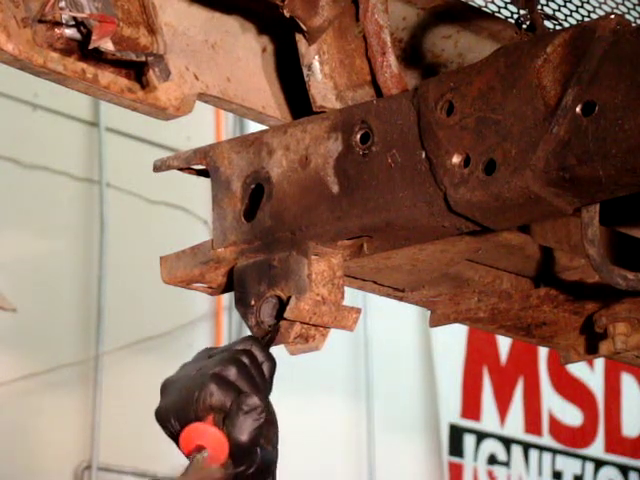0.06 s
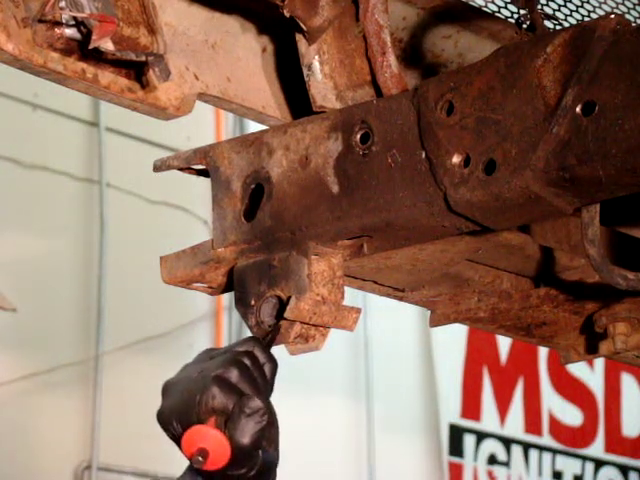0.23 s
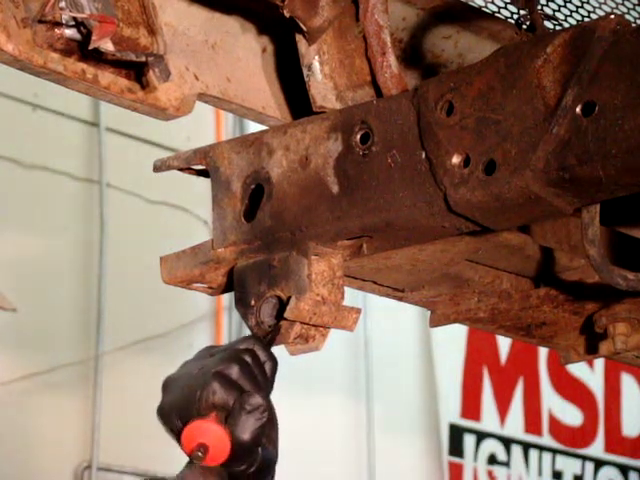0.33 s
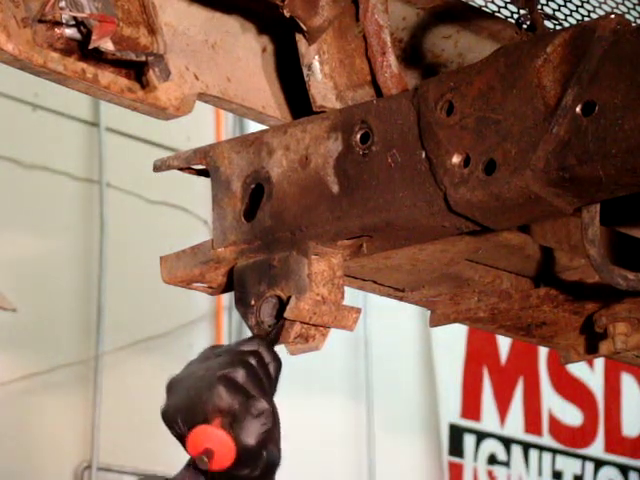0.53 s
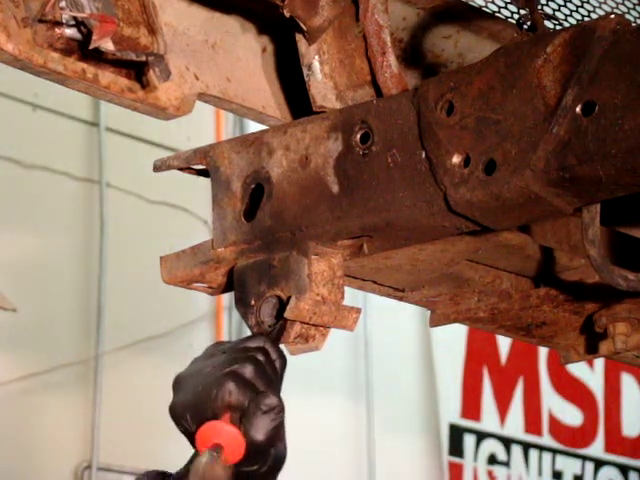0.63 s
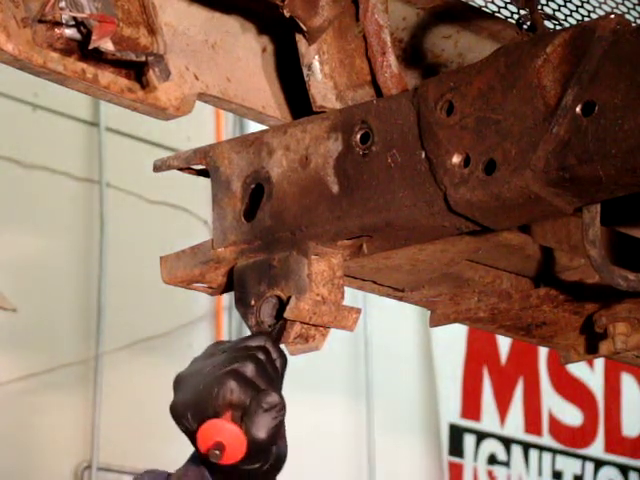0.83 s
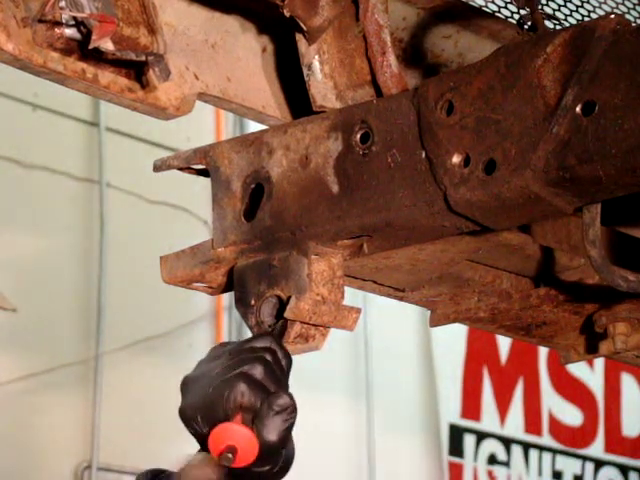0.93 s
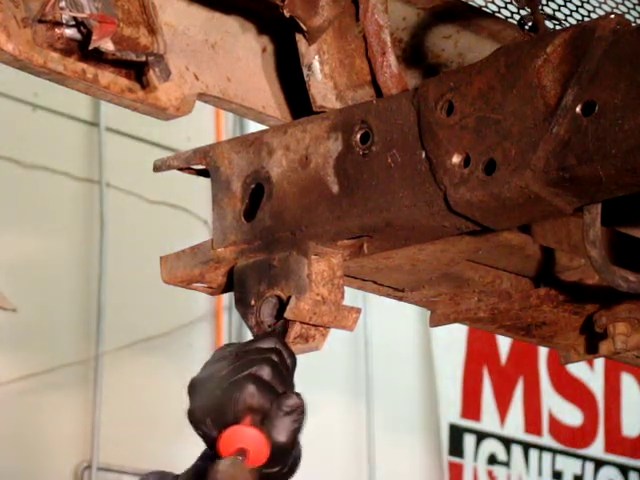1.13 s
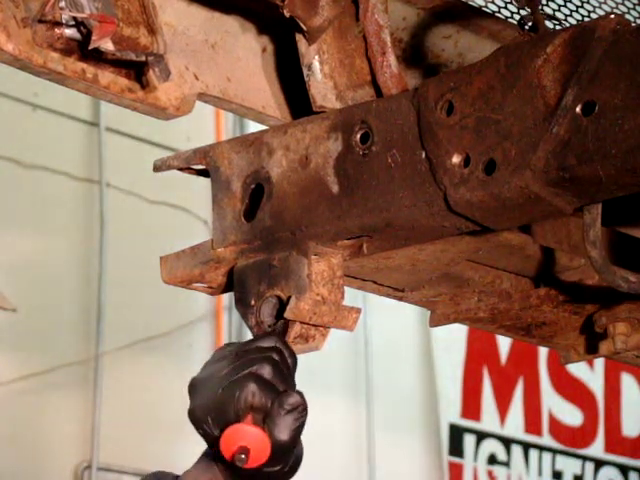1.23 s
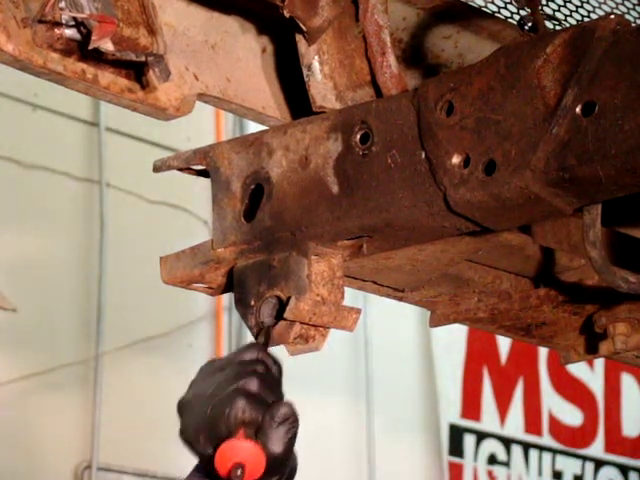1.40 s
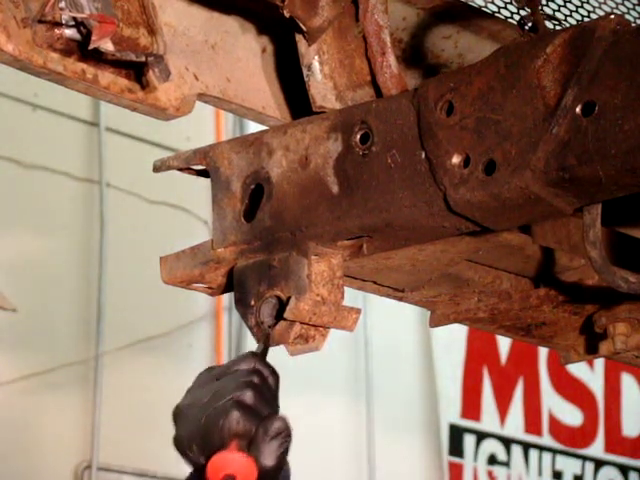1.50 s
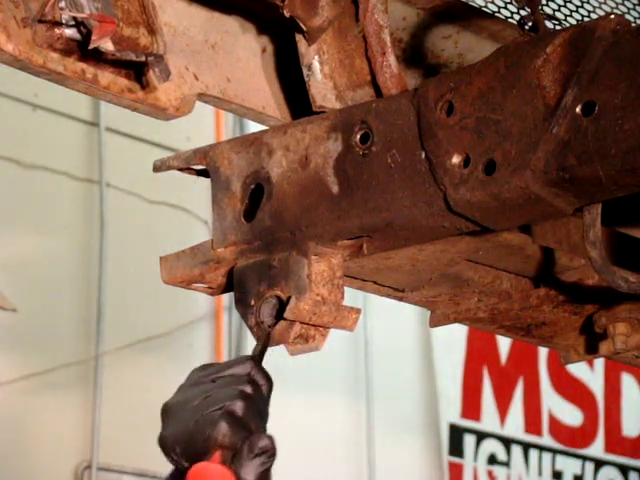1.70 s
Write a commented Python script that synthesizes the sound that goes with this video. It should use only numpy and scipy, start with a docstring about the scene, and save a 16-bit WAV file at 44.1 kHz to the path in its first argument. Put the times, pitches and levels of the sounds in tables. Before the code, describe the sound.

A hammer strikes a steel punch five times, ringing blows in a hard-walled garage.

```python
"""Low room noise and the tail of an earlier ring, on one microphone in a hard-walled garage.
Then five blows: a hammer drives a steel punch against a sleeve in a vehicle frame.
Each is a crack and a short clang of the punch; a bright wash fills the room and the frame rings on.
The first two blows ring near 3 kHz, the last three near 2.1 kHz, as the punch seats differently.
The recorder's gain control ducks the loud blows."""
import sys
import numpy as np
from scipy import signal
from scipy.fft import rfft, irfft
from scipy.io import wavfile
from scipy.ndimage import uniform_filter1d

SR = 44100
rng = np.random.default_rng(int(sys.argv[2]) if len(sys.argv) > 2 else 0)


def digitize_waveform(pressure):
    """Quantize a signal to 16-bit integers and store it at the path in sys.argv[1].

    Rows of a 2-D input are taken as channels; values are limited to [-1, 1].
    """
    field = np.atleast_2d(pressure).T
    bounded = np.clip(field, -1, 1)
    quanta = np.round(bounded * 32767).astype(np.int16)
    wavfile.write(sys.argv[1], SR, quanta)


N = 77175
T = np.arange(N) / SR
HZ = np.maximum(np.fft.rfftfreq(N, 1 / SR), 1)
CUTOFF_HZ = 10150


def from_db(db):
    """Decibels to gain."""
    return 10 ** (np.asarray(db) / 20)


def at_hz(points, hz):
    """Read a table on a log-frequency axis."""
    freqs, values = np.transpose(points)
    return np.interp(np.log(hz), np.log(freqs), values)


def decay(t60):
    """Free decay by 60 dB in t60 seconds."""
    return np.exp(-np.log(1000) * T / t60)


def rise(seconds):
    """Smooth growth from 0 to 1."""
    return 1 - np.exp(-T / seconds)


def noise_spectrum(points):
    """Spectrum of a fresh noise of the given colour and rms 1."""
    gain = from_db(at_hz(points, HZ)) * (HZ < CUTOFF_HZ)
    return rfft(rng.standard_normal(N)) * gain / np.sqrt(np.mean(gain ** 2))


# The garage between blows. Each row: frequency in Hz, relative level in dB.
ROOM_TONE = [(25, -22), (65, -20), (100, -10.5), (170, -13), (340, 5.5), (600, -6.5), (2000, -12),
             (5000, -22), (10000, -23.5)]
# An earlier ring, still hanging in the room. Each row: frequency in Hz, relative level in dB.
EARLIER_RING = [(100, -5), (250, -5), (350, 8.5), (550, -7.5), (1500, -10.5), (3000, -8), (6000, -13),
                (10000, -17.5)]


def garage():
    """Steady room noise and the fading ring of an earlier blow."""
    tail = from_db(-43) * irfft(noise_spectrum(EARLIER_RING), N) * decay(t60=1.63)
    room = from_db(-50) * irfft(noise_spectrum(ROOM_TONE), N)
    return tail + room


# The blows at the vehicle frame. Each row: start in seconds, hit gain in dB, ring gain in dB,
# then the colour in dB of each of the seven seating zones.
HAMMER_BLOWS = [(0.2007, 0, 2, 4, -3, -4, 4, -1, -1, 3.5), (0.4727, -2, 1, 0.5, -1, -2, 8, 3, -3, 8.5),
                (0.7322, -1.5, 2, -1.5, 1.5, 1.5, -1.5, 5, -1.5, 4.5),
                (0.9914, 0, 1.5, -2, 1, 3, -3.5, 4.5, -2, -2.5),
                (1.2403, -1, 0.5, -2.5, 2, 2, -1, -0.5, -3.5, 2)]


def hammering():
    """Each blow: crack and punch clang, then the ring of frame and room."""
    out = np.zeros(N)
    common_spectrum = noise_spectrum(WASH_COLOUR)
    for start_s, hit_db, ring_db, *colour_db in HAMMER_BLOWS:
        hit = from_db(hit_db) * (crack(colour_db) + punch_clang(colour_db))
        ring = from_db(ring_db) * (frame_ring(colour_db) + wash(common_spectrum, colour_db))
        blow = (hit + ring) * rise(seconds=0.00048)
        start = int(start_s * SR)
        out[start:] += blow[:N - start]
    return out


# Zones that vary with the seating of the punch: boom, clank, punch, sleeve, ping, hiss, sizzle.
# Each row: centre in Hz, width in octaves.
SEATING_ZONES = [(330, 1.12), (1250, 0.23), (2100, 0.16), (3000, 0.33), (4250, 0.023), (6300, 0.74),
                 (8150, 0.14)]


def seating(colour_db, hz):
    """Gain at each frequency from the way the punch sits for one blow."""
    bumps_db = (db * np.exp(-.5 * (np.log2(hz / centre) / width) ** 2)
                for db, (centre, width) in zip(colour_db, SEATING_ZONES))
    return from_db(sum(bumps_db))


# The contact, as it reaches the microphone. Each row: frequency in Hz, relative level in dB.
CRACK_COLOUR = [(40, -32.5), (150, -26), (330, -6.5), (550, -16), (800, -8), (1700, 0), (2200, -6.5),
                (4400, 2.5), (6500, -3.5), (10000, -10.5)]


def crack(colour_db):
    """Steel meets steel: a brief burst of noise."""
    burst = irfft(noise_spectrum(CRACK_COLOUR) * seating(colour_db, HZ), N)
    return from_db(-5.5) * burst * decay(t60=0.042)


def modes(table, colour_db, build_cycles, waver_depth=0):
    """Struck modes, each with a slightly different strength on every blow."""
    out = np.zeros(N)
    for hz, db, t60 in table:
        gain = from_db(db + 2 * rng.standard_normal()) * seating(colour_db, hz)
        swing = 1 + waver_depth * waver() if waver_depth else 1
        tone = np.real(swing * np.exp(2j * np.pi * (hz * T + rng.random())))
        out += gain * tone * rise(build_cycles / hz) * decay(t60)
    return out


# Modes of punch and hammer. Each row: pitch in Hz, relative level in dB, t60 in seconds.
PUNCH_MODES = [(1446, -17.5, 0.1), (2075, -9, 0.047), (2154, -14, 0.1), (2820, -20.5, 0.11),
               (3030, -19, 0.18), (4155, -15.5, 0.081), (4530, -13.5, 0.07), (6430, -12.5, 0.034),
               (6486, -7.5, 0.023), (7740, -30, 0.02)]


def punch_clang(colour_db):
    """The struck tools ring at once and die quickly."""
    return modes(PUNCH_MODES, colour_db, build_cycles=0.39)


# Frame and garage ringing around the microphone. Each row: frequency in Hz, relative level in dB.
WASH_COLOUR = [(40, -26.5), (110, -29.5), (152, -6.5), (200, -12.5), (300, -3), (400, -2.5), (500, -2.5),
               (650, -2), (800, -0.5), (950, -3.5), (1250, 0.5), (1650, -3.5), (2100, -1), (2600, -2),
               (3600, -3.5), (4400, -1.5), (5400, -4.5), (7000, -12), (10000, -15.5)]
# How the room fills. Each row: frequency in Hz, rise time in seconds.
WASH_RISE = [(200, 0.041), (700, 0.0064), (2500, 0.0036), (8000, 0.016)]
# How the ring dies away. Each row: frequency in Hz, t60 in seconds.
WASH_DECAY = [(100, 0.85), (350, 1.22), (1000, 1.082), (2200, 1.07), (4500, 0.88), (9000, 0.53)]
WASH_SHARED = 0.79   # share of the power whose fine ring pattern is common to all blows
WALL_DELAY_S, WALL_SHARE = 0.025, 0.17   # the walls return this share of the wash after a delay


def wash(common_spectrum, colour_db):
    """Countless modes of frame and room; the lows fill later and outlast the top."""
    spectrum = np.sqrt(WASH_SHARED) * common_spectrum
    spectrum += np.sqrt(1 - WASH_SHARED) * noise_spectrum(WASH_COLOUR)
    spectrum *= seating(colour_db, HZ)
    edges_hz = np.geomspace(20, 11000, 15)
    out = np.zeros(N)
    for low, high in zip(edges_hz, edges_hz[1:]):
        hz = np.sqrt(low * high)
        band = irfft(spectrum * ((HZ >= low) & (HZ < high)), N)
        out += band * rise(at_hz(WASH_RISE, hz)) * decay(at_hz(WASH_DECAY, hz))
    wall_gain = 1 - WALL_SHARE * (T < WALL_DELAY_S)
    return from_db(-12.5) * out * wall_gain


# Modes of the vehicle frame. Each entry: pitch in Hz.
FRAME_PITCHES = [293, 350, 381, 564, 760, 1183, 1276, 2014, 2088, 2159, 2200, 2830, 3063, 3205, 3451, 3800,
                 4151, 4261]
# The same modes at the microphone. Each entry: relative level in dB.
FRAME_LEVELS = [-35.5, -37, -28, -38, -29, -31.5, -40.5, -36, -27, -33, -38, -34, -30.5, -40, -33, -39.5,
                -33, -36.5]


def frame_ring(colour_db):
    """The ring spreads along the frame over many cycles and dies with the wash."""
    table = zip(FRAME_PITCHES, FRAME_LEVELS, at_hz(WASH_DECAY, FRAME_PITCHES))
    return modes(table, colour_db, build_cycles=42, waver_depth=0.4)


def waver(per_s=16.5):
    """Room paths swing a mode's strength and phase slowly and at random; rms 1."""
    width = int(SR / per_s)
    slow = uniform_filter1d(rng.standard_normal((2, N)), width, mode="wrap")
    slow = uniform_filter1d(slow, width // 2, mode="wrap")
    return (slow[0] + 1j * slow[1]) / np.sqrt(2 * np.mean(slow ** 2))


def smooth(x, seconds):
    """One-pole lag."""
    pole = np.exp(-1 / (seconds * SR))
    return signal.lfilter([1 - pole], [1, -pole], x)


LIMIT_DB, LIMIT_SHARE, RELEASE_DB_PER_S = -12.5, 0.35, 60


def gain_control(x):
    """Each loud blow pushes the recorder's gain down; it recovers at a steady rate."""
    level_db = 10 * np.log10(smooth(x ** 2, seconds=0.006) + 1e-12)
    cut_db = LIMIT_SHARE * np.maximum(level_db - LIMIT_DB, 0)
    release_db = RELEASE_DB_PER_S * T
    held_db = np.maximum.accumulate(cut_db + release_db, axis=-1) - release_db
    return x * from_db(-smooth(held_db, seconds=0.005))


def scene():
    """The blows over the room noise, at one microphone."""
    return (hammering() + garage())[None]


def record(dry):
    """The recorder: gain control, rounded peaks, and a steep cut of the top."""
    ducked = gain_control(dry)
    rounded = ducked / (1 + (ducked / 0.9) ** 4) ** .25   # soft ceiling at 0.9
    return irfft(rfft(rounded) / np.sqrt(1 + (HZ / CUTOFF_HZ) ** 160), N)


dry = scene()
out = record(dry)
digitize_waveform(out)
```